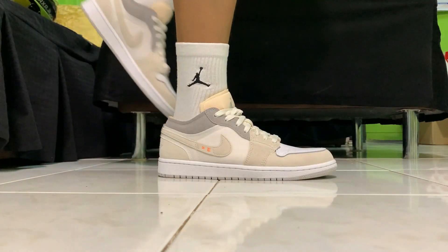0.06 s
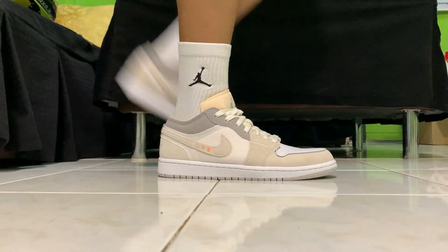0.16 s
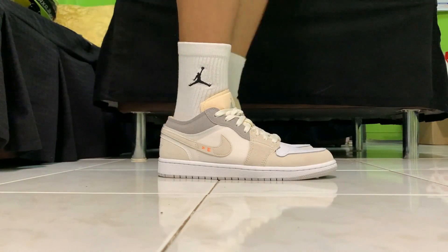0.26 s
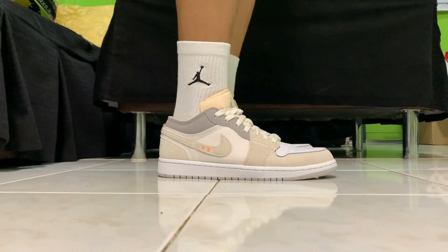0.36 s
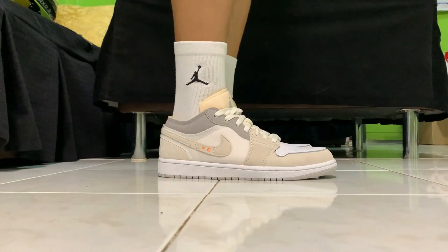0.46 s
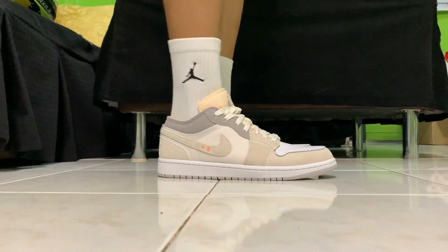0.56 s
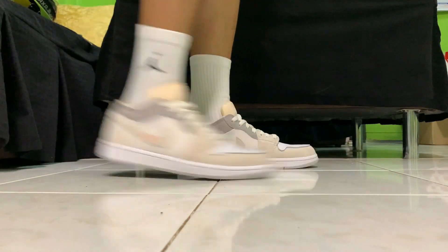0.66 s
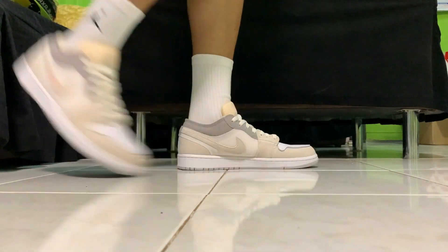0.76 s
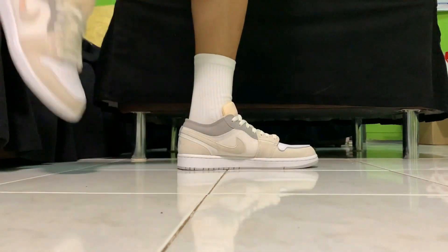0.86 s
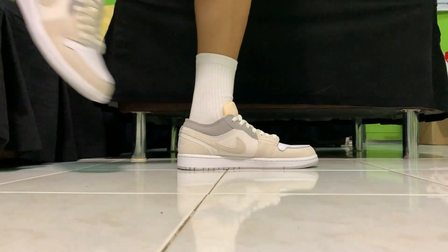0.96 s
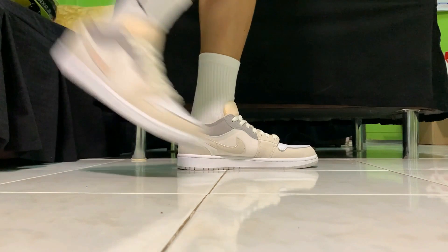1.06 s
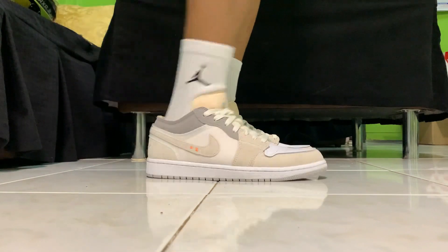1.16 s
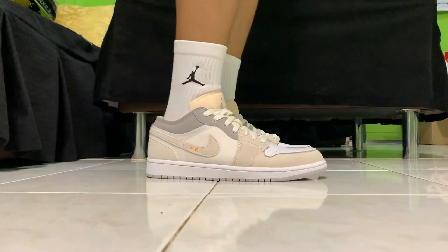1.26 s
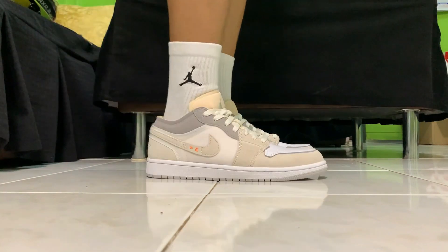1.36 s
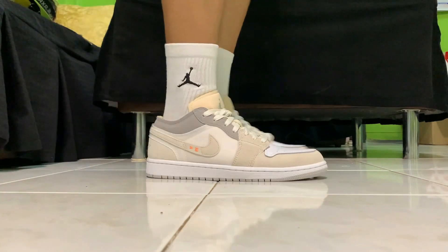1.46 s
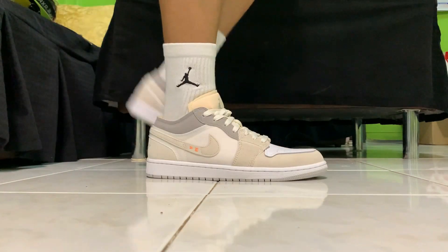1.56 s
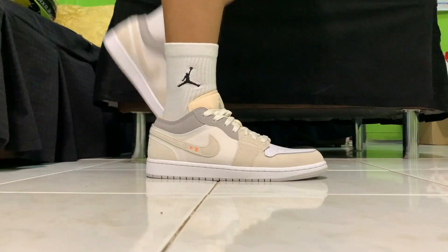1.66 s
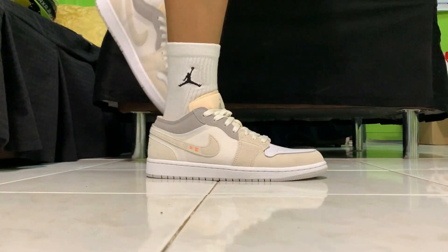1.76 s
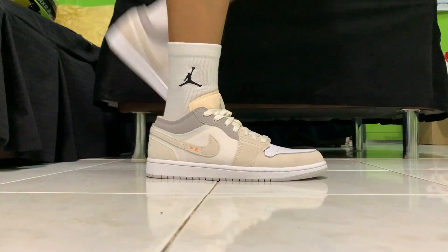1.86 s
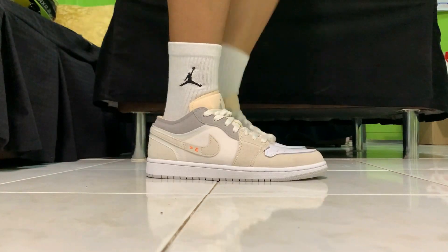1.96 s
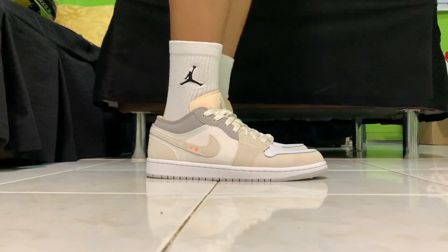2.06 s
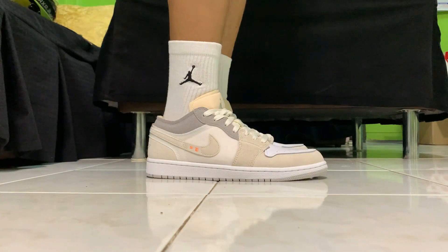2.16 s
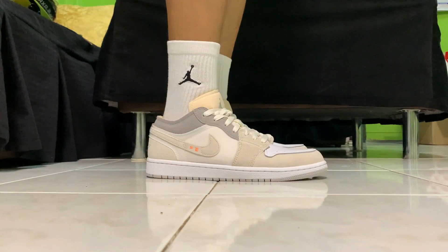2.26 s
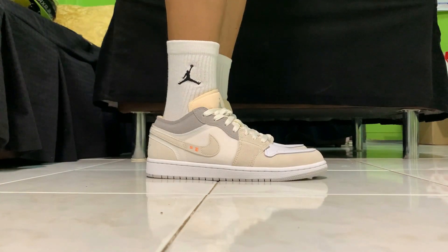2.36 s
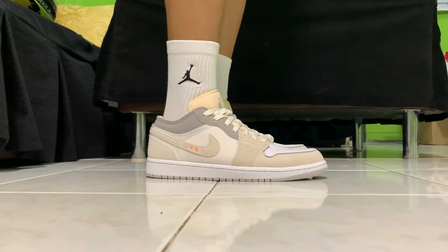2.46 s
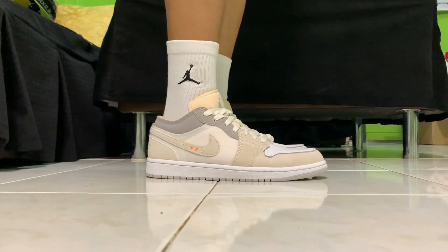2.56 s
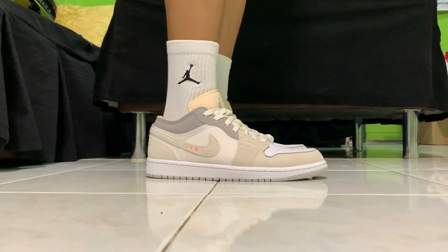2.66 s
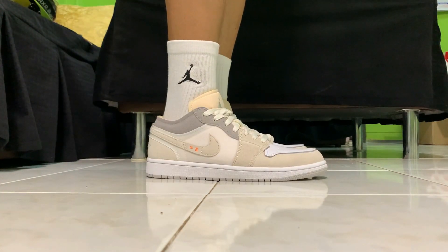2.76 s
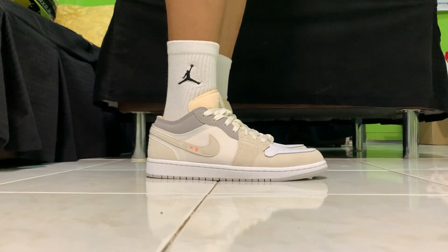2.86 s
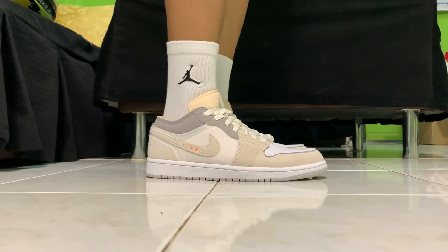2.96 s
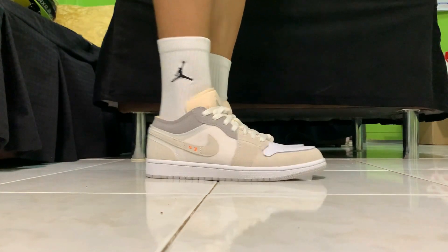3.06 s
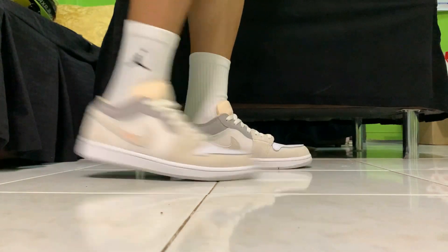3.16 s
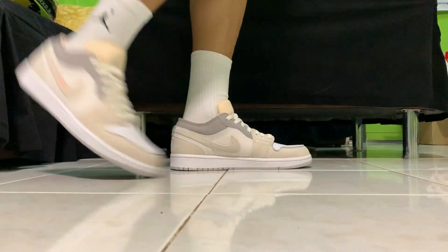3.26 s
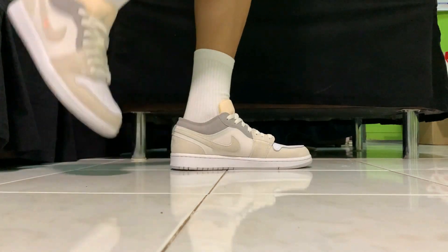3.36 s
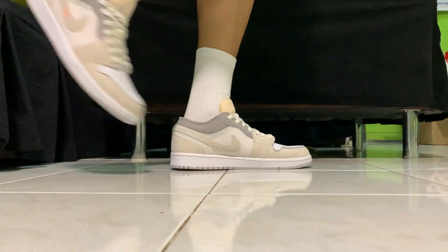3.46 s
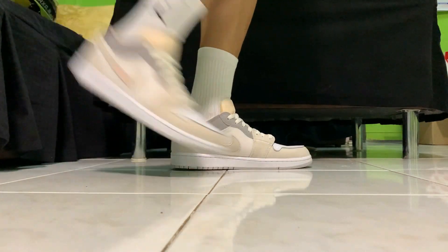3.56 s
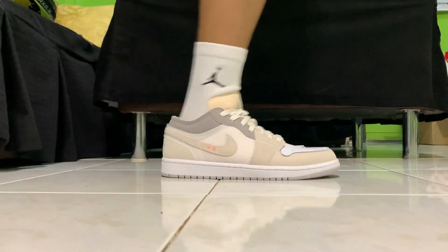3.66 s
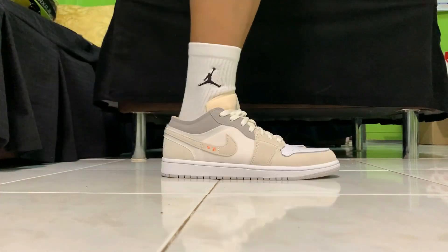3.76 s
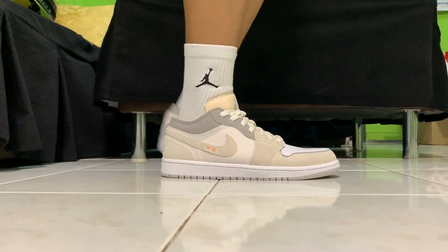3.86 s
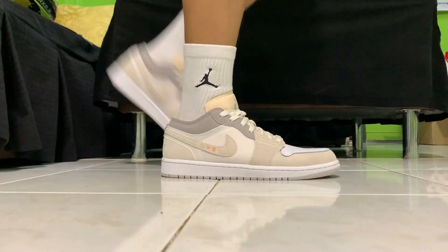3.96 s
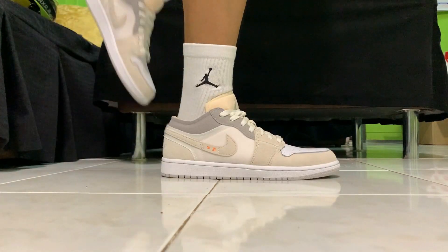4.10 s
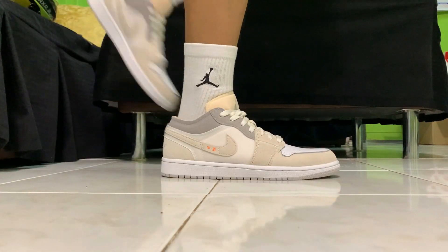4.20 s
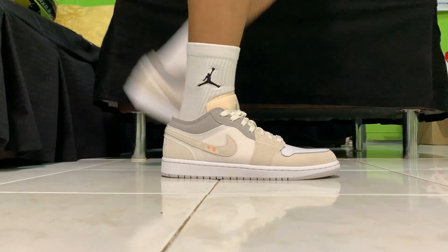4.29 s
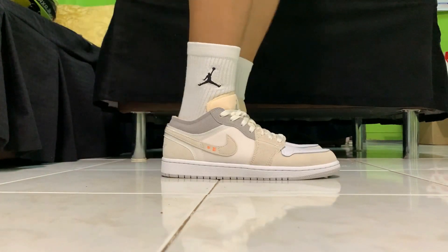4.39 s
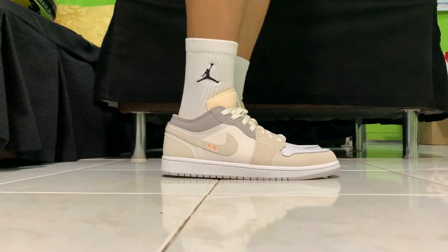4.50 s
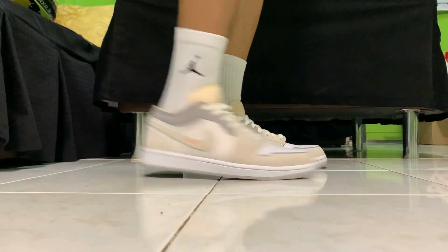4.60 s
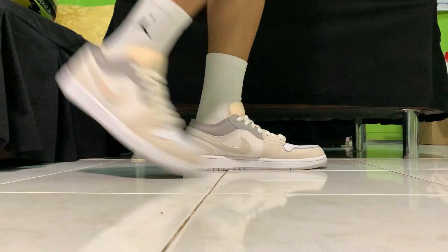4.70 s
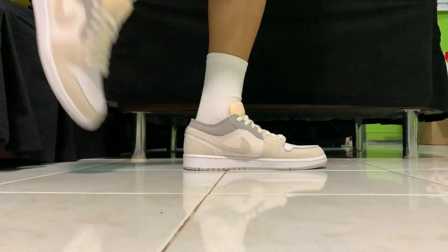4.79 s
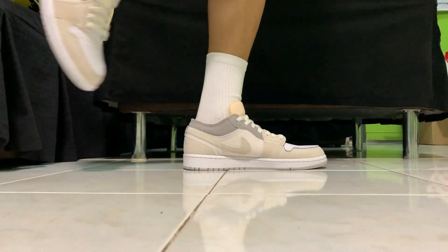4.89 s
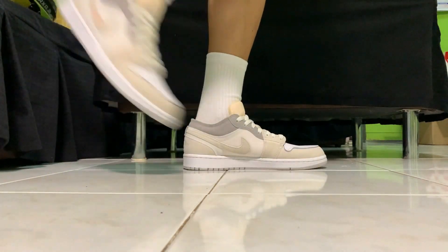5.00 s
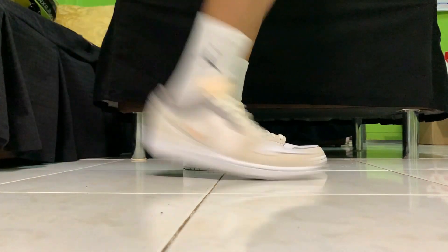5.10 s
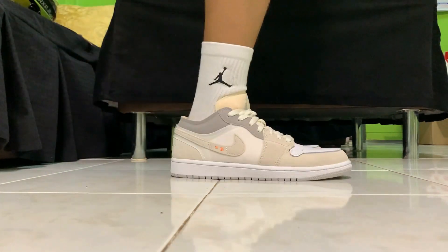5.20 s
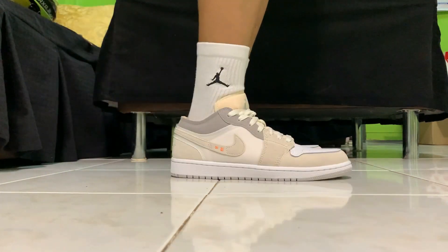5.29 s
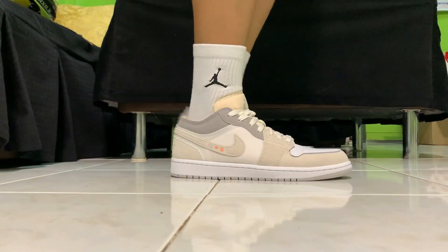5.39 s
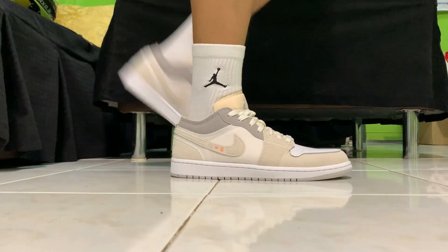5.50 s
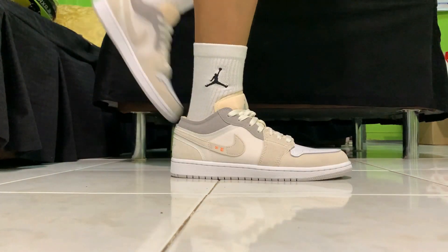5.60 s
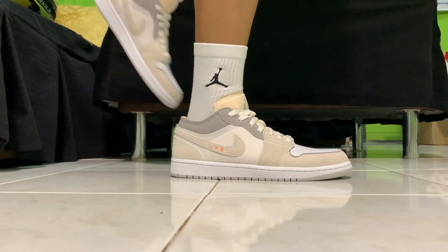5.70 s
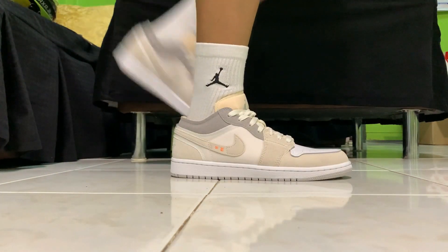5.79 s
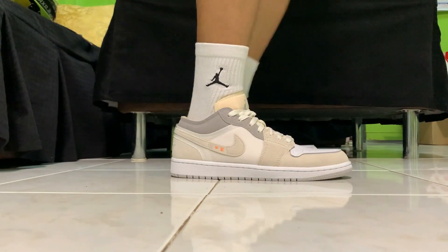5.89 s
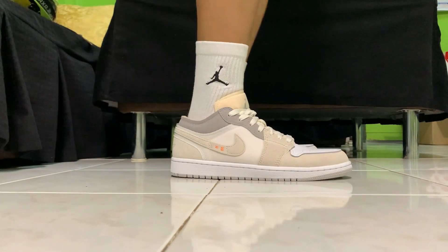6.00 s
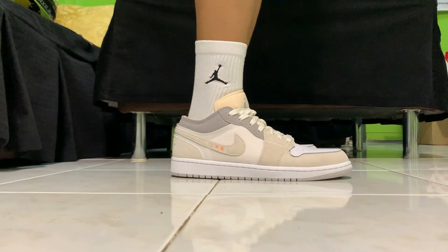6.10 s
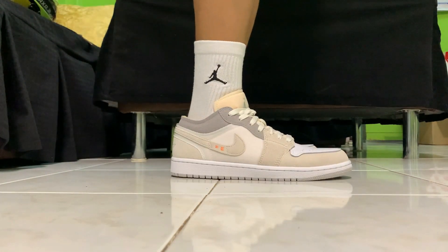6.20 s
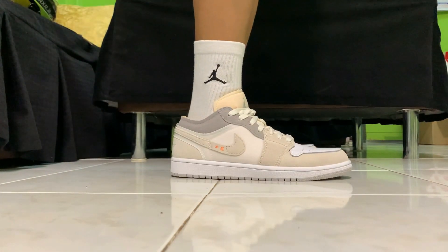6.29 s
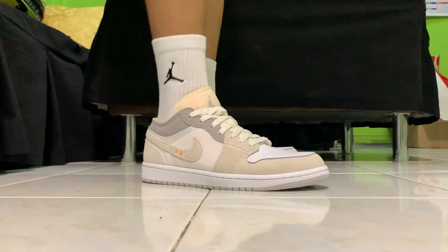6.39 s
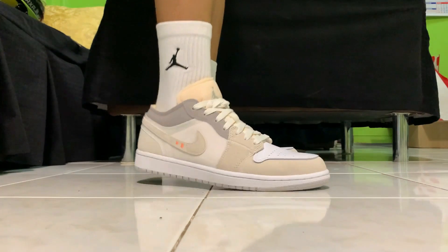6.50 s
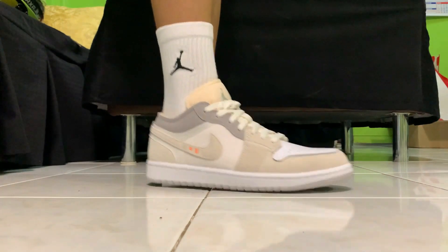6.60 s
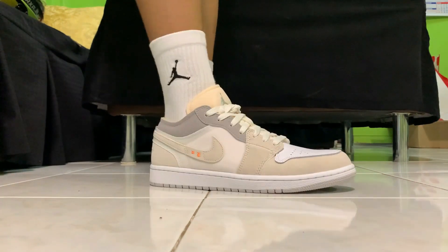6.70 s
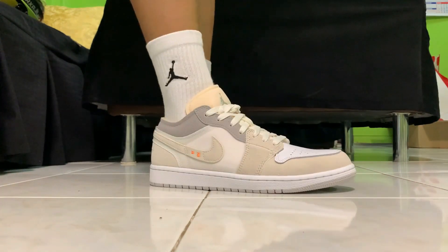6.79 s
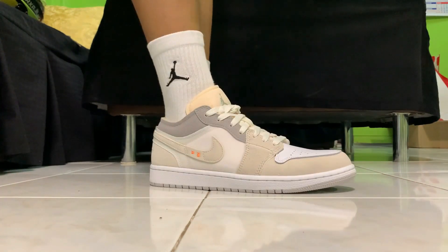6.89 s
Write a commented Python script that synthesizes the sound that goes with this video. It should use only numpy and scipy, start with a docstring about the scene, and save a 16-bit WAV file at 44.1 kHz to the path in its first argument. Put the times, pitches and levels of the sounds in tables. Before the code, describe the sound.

Close, irregular shoe stamps on hard tile, most biting into brief piercing rubber chirps that ring in the room above quiet air and hum.

```python
"""A faint hum, soft room air and the last ring of an earlier squeak are heard first.
Then a sneaker is stamped and dragged on a glossy tile floor, close to the microphone, in a small hard room.
Each landing gives a falling thump; the rubber then sticks and slips in a short shrill squeak, a stack of
partials that the room rings on. Sliding rubber scuffs as grainy noise, and the flexing shoe ticks.
Near the end a soft background hiss sets in abruptly, then a faint thin whistle near 4 kHz, both from noise."""
import sys
import numpy as np
from scipy import signal
from scipy.fft import rfft, irfft, next_fast_len
from scipy.io import wavfile
from scipy.ndimage import uniform_filter1d, minimum_filter1d, map_coordinates

SR = 44100
rng = np.random.default_rng(int(sys.argv[2]) if len(sys.argv) > 2 else 0)


def wav_out(sig):
    """Save sig, one row per channel (or a flat mono array), as 16-bit PCM at SR to the path in sys.argv[1]."""
    wavfile.write(sys.argv[1], SR, np.round(np.clip(np.atleast_2d(sig).T, -1, 1) * 32767).astype(np.int16))


N = 306437
LEAD = SR // 2   # samples before time zero, so the room is already ringing there
TIME = np.arange(-LEAD, N) / SR


def from_db(db):
    """Turn decibels into a plain multiplier."""
    return 10 ** (np.asarray(db) / 20)


def rms_one(x):
    """Scale a sound to an average strength (rms) of 1."""
    return x / np.sqrt(np.mean(x ** 2) + 1e-20)


def at_hz(points, hz):
    """Read a table between its points, on a log-frequency axis."""
    f, value = np.transpose(points)
    return np.interp(np.log(np.maximum(hz, 1)), np.log(f), value)


def add(track, s, sound):
    """Mix a sound into a track at time s, in seconds."""
    at = round(s * SR) + LEAD
    track[at:at + len(sound)] += sound[:len(track) - at]


def filtered(x, response):
    """Change each frequency of a sound by a response given as a function of Hz."""
    length = x.shape[-1]
    size = next_fast_len(length + 2048)
    hz = np.arange(size // 2 + 1) * SR / size
    return irfft(rfft(x, size) * response(hz), size)[..., :length]


def noise(spectrum, size, tilt_db=0):
    """Coloured noise, rms 1; the tilt, in dB per octave, acts above 500 Hz."""
    def colour(f):
        return from_db(at_hz(spectrum, f) + tilt_db * np.log2(np.maximum(f, 500)))
    return rms_one(filtered(rng.standard_normal(size), colour))


def wander(rate_hz, size):
    """Smooth random motion through random points, with a spread of about 1."""
    knots = rng.standard_normal(int(size * rate_hz / SR) + 3)
    return map_coordinates(knots, [np.arange(size) * rate_hz / SR], order=3, mode="nearest")


# how alike left and right are in sound from all around: (frequency [Hz], likeness [0-1])
SIDE_LIKENESS = [(60, .95), (130, .9), (290, .55), (640, .05), (3000, .1), (15000, 0)]


def diffuse(mid, side):
    """Sound from all around: long bass waves reach both ports alike, shorter waves do not."""
    def alike(f):
        return np.clip(at_hz(SIDE_LIKENESS, f), -.99, .99)
    shared = filtered(mid, lambda f: np.sqrt(1 + alike(f)))
    opposed = filtered(side, lambda f: np.sqrt(1 - alike(f)))
    return shared + opposed * [[1], [-1]]


def diffuse_noise(spectrum):
    """Coloured noise from all around, rms 1."""
    return rms_one(diffuse(noise(spectrum, len(TIME)), noise(spectrum, len(TIME))))


# steady tones of the electric hum: (frequency [Hz], level [dB])
HUM_TONES = [(64.6, -67), (120, -64), (152, -75.5), (193, -73.5)]
# colour of the room air: (frequency [Hz], level per Hz [dB])
AIR_COLOUR = [(15, -45.5), (25, -11), (127, -5), (236, -16.5), (463, -21), (531, -17.5), (936, -31),
              (1400, -28), (1890, -42.5), (6920, -52.5), (8590, -60), (11300, -46.5), (16000, -64.5)]


def background(air_db=-61, drift_db=-3.5, waver_db=5):
    """Gently drifting room air, made of noise, and a slightly wavering electric hum, made of sines."""
    hum = np.zeros(len(TIME))
    for hz, db in HUM_TONES:
        tone = np.sqrt(2) * np.sin(2 * np.pi * (hz * TIME + rng.random()))
        hum += from_db(db + waver_db * wander(2.1, len(TIME))) * tone
    air_level = from_db(air_db + drift_db * wander(5.7, len(TIME)))
    return hum + air_level * diffuse_noise(AIR_COLOUR)


# stick-slip squeaks: (time [s], length [s], level [dB], lowest pitch [Hz], octave partial [dB],
# brightness [dB], bite [0-1])
SQUEAK_EVENTS = [(-.2, .015, -21, 2660, -24, -46.5, 0.4), (0.27, .0075, -8.5, 2698, -15.5, -26.5, .45),
                 (0.6615, 0.019, -16, 2540, -9, -14, 0.5), (1.1743, .0145, -9, 2513, -7, -0.5, 0.8),
                 (1.5097, .009, -26.5, 2758, -30.5, -45, .1), (1.559, .008, -24.5, 2871, -3, -18, .2),
                 (2.007, .009, -8, 2688, -12, -23, .6), (3.153, .02, -9.5, 2508, -9, -15.5, .3),
                 (3.676, .019, -10, 2458, -7.5, -1.5, 0.99), (4.3989, .007, -7, 2431, -14.5, -19, .8),
                 (4.628, 0.0061, -28.5, 2772, -21, -35, .05), (5.152, .014, -8.5, 2490, -10.5, -2.5, .65),
                 (5.926, .0085, -9.5, 2648, -7.5, -13.5, .6)]
# third to sixth partial: (level at brightness 0 [dB], share of the brightness it follows [ratio])
UPPER_PARTIALS = [(0, 1.0), (-9, 1.25), (-28, .9), (-34.5, 0.95)]
# colour of rubber noise, also used by ticks and scuffs: (frequency [Hz], level per Hz [dB])
RUBBER_COLOUR = [(150, 4), (500, -5.5), (1200, -2.5), (2500, 0), (4200, 0), (7000, 3), (8700, -17.5),
                 (10500, -2), (13400, -21), (15000, -15.5)]


def squeaks(edge_s=0.0005, release_s=0.0014, sag_db=-9.0, creep_db=-19, shimmer_db=4.0,
            top_db=1.5, lock_hz=260, crack_db=-14, crack_s=0.0017):
    """The tread creeps faintly, then breaks into full stick-slip; a harder bite starts higher and rougher."""
    bite_hz, grip_s = 604.8, .0015   # a full bite starts this far up; its pitch settles in about this time
    rise_hz, rise_s, rise_law = 239.6, .018, 2.6   # as the load comes off, pitch climbs by this power of time
    creep_s, creep_per_length = 0.0033, 0.35   # creep time, plus this share of the squeak's length
    jitter = .02   # share by which a fully rough squeak's pitch wavers
    out = np.zeros(len(TIME))
    t = np.arange(-SR // 25, SR // 20) / SR
    since = np.maximum(t, 0)
    unsettled = np.exp(-since / grip_s)
    for s, length, db, lowest, octave_db, bright_db, bite in SQUEAK_EVENTS:
        rough = np.clip(bite, 0, 1)
        progress = np.clip(t / length, 0, 1)
        hz = lowest + bite_hz * rough * unsettled + rise_hz * (progress * length / rise_s) ** rise_law
        # the creep glides from the squeak's end pitch to its starting pitch
        hz = hz + (hz[-1] - hz) * np.clip(-t / (2 * grip_s), 0, 1)
        wavering_hz = hz * (1 + jitter * rough * wander(700, len(t)))
        phase = 2 * np.pi * np.cumsum(wavering_hz) / SR

        gripping = .5 + .5 * np.tanh((t - edge_s) / (2 * edge_s))
        creep_time = creep_s + creep_per_length * length
        creep = from_db(creep_db) * np.exp(-(np.minimum(t, 0) / creep_time) ** 2)
        release = .5 - .5 * np.tanh((t - length) / (2 * release_s))
        force = (gripping + (1 - gripping) * creep) * release * from_db(top_db + sag_db * progress)
        # slips are sharpest, and upper partials strongest, once the tread locks to its lowest pitch
        sharp = (1 - .5 * unsettled) / (1 + ((hz - lowest) / lock_hz) ** 2)

        # a rough grip tears loose with a crack
        crack_level = from_db(crack_db) * rough ** 2
        sound = crack_level * noise(RUBBER_COLOUR, len(t)) * gripping * np.exp(-since / crack_s)
        upper = [base_db + follows * bright_db for base_db, follows in UPPER_PARTIALS]
        for k, partial_db in enumerate([0, octave_db] + upper):
            gain = from_db(partial_db + shimmer_db * rough * wander(250, len(t)))
            sound = sound + np.sqrt(2) * force * sharp ** k * gain * np.sin((k + 1) * phase)
        add(out, s + t[0], from_db(db) * sound)
    return out


# small ticks of the shoe: (time [s], level [dB])
TICK_EVENTS = [(.062, -61), (0.596, -51.5), (3.081, -39.5), (6.434, -63.5), (6.473, -57)]


def ticks(decay_s=0.0013, tilt_db=6.5):
    """Tiny bright snaps as the shoe flexes: noise that dies at once."""
    out = np.zeros(len(TIME))
    t = np.arange(SR // 50) / SR
    for s, db in TICK_EVENTS:
        snap = .5 * noise(RUBBER_COLOUR, len(t), tilt_db) * np.exp(-t / decay_s)
        add(out, s, from_db(db) * snap)
    return out


# sole slaps: (time [s], level [dB], contact time [s], edge snap [dB])
SLAP_EVENTS = [(.2328, -15.5, .014, -29.5), (.7495, -20.5, 0.0067, -14), (1.1576, -18.5, .015, -9.5),
               (1.977, -17.5, .014, -27), (2.0383, -24, 0.011, -29), (3.2431, -35, 0.011, -11.5),
               (3.652, -21.5, 0.012, -16), (3.6954, -14.5, .007, -26.5), (4.3661, -22, .0125, -22),
               (4.4165, -25, 0.0087, -30), (4.7292, -17.5, 0.01, -18.5), (5.1308, -19.5, .0145, -7.5),
               (5.189, -38.5, 0.0065, -29.5), (5.897, -18.5, .0135, -29), (6.6464, -30.5, 0.012, -3),
               (6.6642, -28.5, .014, -18)]
# ring of the shoe and the floor under it: (frequency [Hz], level [dB], time to fall by 60 dB [s])
BODY_RING = [(77.6, -17.5, .12), (164, -11, 0.022), (245.2, -19, .06), (472, -21, 0.092), (513, -15, 0.13)]
# colour of the edge snap: (frequency [Hz], level per Hz [dB])
SNAP_COLOUR = [(400, -25), (1200, 5), (1800, -8), (3000, -16), (8000, -31), (14000, -48.5)]
# colour of the flutter: (frequency [Hz], level per Hz [dB])
FLUTTER_COLOUR = [(50, -8.5), (120, 2.5), (250, 3.5), (550, -6.5), (850, -9.5), (1400, -24), (2500, -18.5),
                  (6000, -40.5), (14000, -70)]
# how strongly slaps radiate: (frequency [Hz], gain [dB])
SOLE_GAIN = [(40, -6), (90, 2.5), (170, 4), (240, -2), (320, -7.5), (420, 0), (560, 4), (850, 0.5),
             (1300, 3), (2500, -3.5), (8000, -6)]


def slaps(lowest_hz=40, flutter_db=-17, flutter_s=0.011, weight_s=0.016, early=0.86, snap_s=0.00067):
    """The sole closes on the tile: an edge snap, a tone falling as contact spreads, a flutter, a short ring."""
    start_hz, usual_contact_s, start_law = 1120, .012, 1.05   # longer contacts start higher, by this power
    halving_cycles = 1.75   # cycles of the falling part's first pitch in which that part halves
    out = np.zeros(len(TIME))
    t = np.arange(SR // 5) / SR
    for s, db, contact_s, snap_db in SLAP_EVENTS:
        first_hz = start_hz * (contact_s / usual_contact_s) ** start_law
        falling_hz = lowest_hz + first_hz / (1 + t * first_hz / halving_cycles)
        phase = 2 * np.pi * np.cumsum(falling_hz) / SR
        swell = np.sin(np.pi * np.minimum(t / contact_s, 1) ** early)
        snap_shape = (t / snap_s) * np.exp(1 - t / snap_s)
        snap = from_db(snap_db) * .5 * noise(SNAP_COLOUR, len(t)) * snap_shape
        flutter = from_db(flutter_db) * noise(FLUTTER_COLOUR, len(t)) * np.exp(-t / flutter_s)
        add(out, s, from_db(db) * (swell * np.sin(phase) + snap + flutter))

        # a slow, flat landing puts more weight into the floor than a quick flick
        weight = min(contact_s / weight_s, 1) ** 2
        ring = np.zeros(len(t))
        for hz, mode_db, t60 in BODY_RING:
            ring += from_db(mode_db - 60 * t / t60) * np.sin(2 * np.pi * hz * t)
        add(out, s + contact_s / 2, from_db(db) * weight * ring)
    return filtered(out, lambda f: from_db(at_hz(SOLE_GAIN, f)))


# sliding scuffs: (time when loudest [s], half length [s], level [dB])
SCUFF_EVENTS = [(.625, 0.049, -61.5), (.712, 0.035, -44), (1.57, 0.07, -58), (3.192, 0.038, -49.5),
                (3.947, 0.048, -62.5), (4.659, 0.057, -54.5), (5.472, 0.076, -61.5), (6.721, .035, -60)]


def scuffs(grain_db=4.0, grain_hz=500, fall_ratio=0.89, drag_lead_s=.002):
    """Rubber slides without gripping: a grainy hiss, long in a scuff and brief round each squeak."""
    even_db, brightens = -45, 0.27   # below this level a scuff dulls, by dB per octave for each dB
    drag_db, drag_follows = -30.5, .3   # slide round a squeak: against its level, share of its brightness
    drag_half_s, drag_tilt_db = .011, -4   # half length, and tilt per octave
    slides = []
    for s, half_s, db in SCUFF_EVENTS:
        slides.append((s, half_s, db, brightens * (db - even_db)))
    for s, _, db, _, _, bright_db, _ in SQUEAK_EVENTS:
        slides.append((s - drag_lead_s, drag_half_s, db + drag_db + drag_follows * bright_db, drag_tilt_db))
    out = np.zeros(len(TIME))
    t = np.arange(-SR // 5, SR // 5) / SR
    for s, half_s, db, tilt_db in slides:
        width = np.where(t < 0, half_s, half_s * fall_ratio)
        stroke = np.exp(-.5 * (t / width) ** 2)
        grain = from_db(grain_db * wander(grain_hz, len(t)))
        grit = rms_one(noise(RUBBER_COLOUR, len(t), tilt_db) * grain)
        add(out, s + t[0], from_db(db) * stroke * grit)
    return out


# colour of the late background hiss: (frequency [Hz], level per Hz [dB])
HISS_COLOUR = [(150, -31), (250, 0), (510, -3), (597, -2.5), (1610, -12), (1850, -11.5), (2160, -13.5),
               (3520, -15), (3980, -14.5), (4570, -24.5), (16000, -29.5)]
# colour of the faint whistle: (frequency [Hz], level per Hz [dB])
WHISTLE_COLOUR = [(3500, -44), (3940, -16.5), (4030, -10.5), (4120, -20), (4600, -39.5), (6200, -27.5),
                  (6550, -22), (7000, -39.5)]


def late_hiss():
    """A soft noise hiss sets in abruptly; a thin whistle of narrow-band noise fades in."""
    def swell(s, attack_s, db):
        return from_db(db) * (.5 + .5 * np.tanh((TIME - s) / attack_s))
    hiss = swell(6.433, 0.0031, -61) * diffuse_noise(HISS_COLOUR)
    whistle = swell(6.79, .04, -67) * diffuse_noise(WHISTLE_COLOUR)
    return hiss + whistle


# phase between the two microphone ports: (frequency [Hz], lead of left over right [radians])
LEFT_LEAD = [(60, 0), (700, .2), (2500, .1), (2800, 1.1), (5000, 1.5), (5500, 3.0), (5850, .8), (7600, 4.4),
             (8400, 3.6), (10200, 7.1), (11000, 6.3), (12700, 8.6), (15000, 9)]
# level between the two ports: (frequency [Hz], left minus right [dB])
LEFT_EXCESS = [(60, -3), (1200, 1.5), (2600, -2.5), (5200, -6), (7700, -2), (15000, 2.5)]


def ports(x):
    """Near sound reaches the two ports with unlike phase and level."""
    def half(f):
        return np.exp(.5j * at_hz(LEFT_LEAD, f)) * from_db(at_hz(LEFT_EXCESS, f) / 2)
    left = filtered(x, half)
    right = filtered(x, lambda f: 1 / half(f))
    return np.array([left, right])


# strength of the room's tail: (frequency [Hz], level [dB])
TAIL_LEVEL = [(60, -16), (200, -11.5), (500, -6), (1200, -5.5), (2600, -9.5), (3800, -14), (5200, -5.5),
              (7700, -20), (10300, -9.5), (15000, -10)]
# how long the tail rings: (frequency [Hz], time to fall by 60 dB [s])
TAIL_T60 = [(60, 0.37), (500, .28), (1500, 0.25), (2600, 0.43), (5200, .41), (7800, .41), (10500, 0.22),
            (15000, .25)]
# near reflections: (delay [s], level [dB])
NEAR_ECHOES = [(.0085, -17), (0.013, -18), (.021, -19)]


def room(x, build_s=0.0013):
    """A few near reflections, then a diffuse tail that dies band by band."""
    t = np.arange(SR * 3 // 4) / SR
    white, tail = rng.standard_normal((2, len(t))), 0
    centres = np.geomspace(60, 15360, 17)
    for hz, own in zip(centres, np.eye(len(centres))):
        band = filtered(white, lambda f: at_hz(np.c_[centres, own], f))
        decay = from_db(-60 * t / at_hz(TAIL_T60, hz)) * (1 - np.exp(-(t / build_s) ** 2))
        tail = tail + band * decay / np.sqrt(np.sum(decay ** 2))
    response = filtered(diffuse(*tail), lambda f: from_db(at_hz(TAIL_LEVEL, f)))
    for delay, db in NEAR_ECHOES:
        for side in response:
            # each side hears the reflection at a slightly different moment
            side[int(delay * SR * rng.uniform(.98, 1.02))] += from_db(db)
    return signal.fftconvolve(x[None], response, axes=1)[:, :len(x)]


def moving_in_room(x, count=3, moves_hz=2):
    """The foot keeps changing place, so each sound meets a different blend of reflections."""
    blend = np.array([wander(moves_hz, len(x)) for _ in range(count)])
    shares = blend / np.linalg.norm(blend, axis=0)
    return sum(room(x * share) for share in shares)


def scene():
    """The shoe heard directly and through the room, over the background and the late hiss."""
    shoe = squeaks() + ticks() + slaps() + scuffs()
    whole = background() + ports(shoe) + moving_in_room(shoe) + late_hiss()
    return whole[:, LEAD:]


def record(dry, ceiling=0.95, cutoff_hz=15900):
    """A fast limiter turns down peaks above the ceiling; then rumble and the top are cut."""
    need = np.minimum(1, ceiling / (np.abs(dry).max(axis=0) + 1e-9))
    gain = uniform_filter1d(minimum_filter1d(need, size=129), size=129)   # sizes in samples
    no_rumble = signal.butter(2, 50, "high", fs=SR, output="sos")
    no_top = signal.ellip(10, .1, 80, cutoff_hz, fs=SR, output="sos")
    return signal.sosfilt(no_top, signal.sosfilt(no_rumble, dry * gain))


dry = scene()
out = record(dry)
wav_out(out)
```